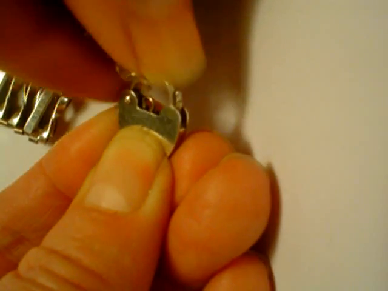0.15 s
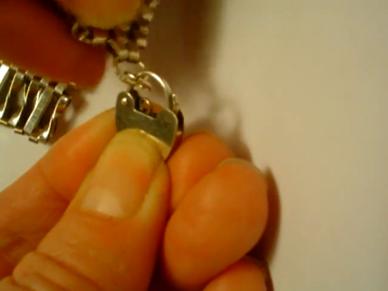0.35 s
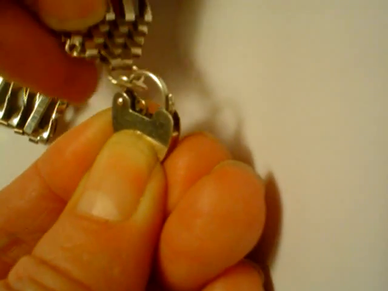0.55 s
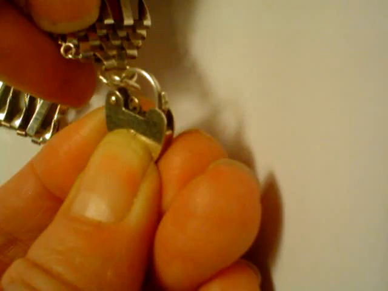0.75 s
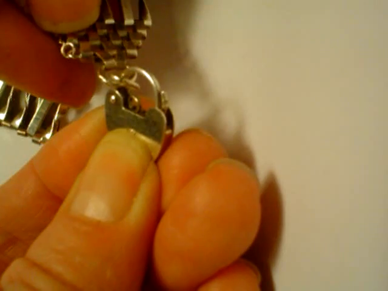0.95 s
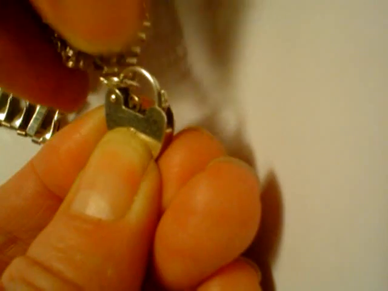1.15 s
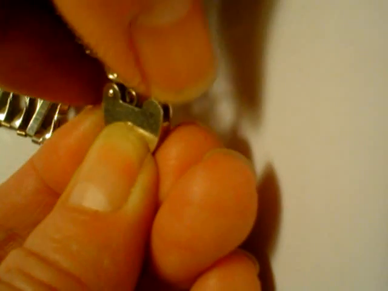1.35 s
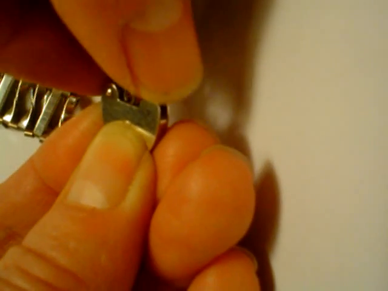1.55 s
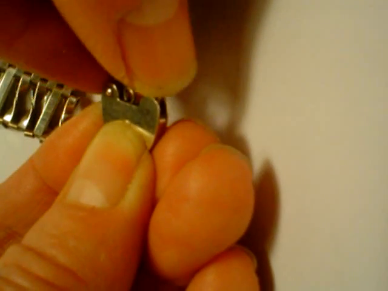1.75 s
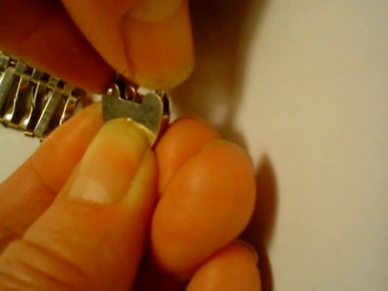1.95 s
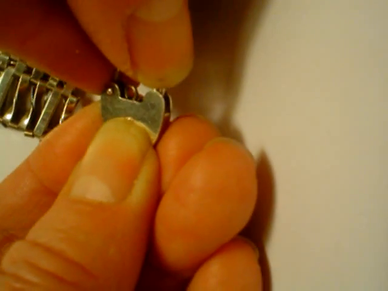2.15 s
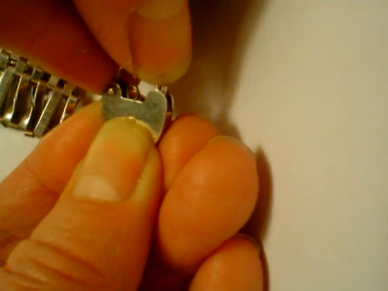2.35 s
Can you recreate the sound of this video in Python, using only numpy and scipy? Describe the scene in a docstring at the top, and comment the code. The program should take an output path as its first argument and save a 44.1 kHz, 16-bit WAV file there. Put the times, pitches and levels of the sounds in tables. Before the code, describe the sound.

Small metal clasp snapped sharply by fingers, a second rattling snap, then faint ticks over hiss

```python
"""Fingers snap a small metal padlock clasp open and shut close by, and bracelet links tick: short rattles of
impacts ring the damped metal. The strongest snaps also thump through hands and table.
Skin slides on the metal as a dense crackle of tiny slips. Around them a small motor hums in wavering
partials, over a steady, patchy hiss and a thin electronic whine made of two high sines."""
import sys
import numpy as np
from scipy import signal
from scipy.fft import rfft, irfft
from scipy.io import wavfile
from scipy.ndimage import uniform_filter1d

SR = 44100
rng = np.random.default_rng(int(sys.argv[2]) if len(sys.argv) > 2 else 0)


def inscribe(sig):
    """Save sig as 16-bit PCM at rate SR to the path in sys.argv[1].

    A 1-D sig is mono; a 2-D sig holds one channel per row.
    Samples are clipped to [-1, 1] before scaling.
    """
    pcm = np.round(np.clip(np.atleast_2d(sig).T, -1, 1) * 32767)
    wavfile.write(sys.argv[1], SR, pcm.astype(np.int16))


N = 105840  # length in samples: 2.4 s
MOTOR_HZ = 48.44  # motor speed, shared by the hum and the throb of the hiss


def amp(db):
    """Turns dB into a plain multiplier."""
    return 10 ** (np.asarray(db) / 20)


def evened(x):
    """Scales x to rms 1."""
    return x / np.sqrt(np.mean(x ** 2) + 1e-20)


def read(points, hz):
    """Reads a table of pitches between its points, on a log pitch scale."""
    f, value = np.transpose(points)
    return np.interp(np.log(hz + 1), np.log(f + 1), value)


def over_time(points):
    """Reads a table of times at every sample, in straight lines between its points."""
    return np.interp(np.arange(N) / SR, *np.transpose(points))


def add(mix, s, sound):
    """Mixes a sound in at s seconds, cut off at the end of the mix."""
    part = mix[round(s * SR):][:len(sound)]
    part += sound[:len(part)]


def coloured(x, spectrum):
    """Filters x by the spectrum, then sets it to rms 1."""
    gain = amp(read(spectrum, np.fft.rfftfreq(len(x), 1 / SR)))
    return evened(irfft(rfft(x) * gain, len(x)))


def drift(hz):
    """Slow random wander below hz, at rms 1; the first second is dropped so the filter has settled."""
    wander = signal.lfilter(*signal.butter(2, hz, fs=SR), rng.standard_normal(N + SR))
    return evened(wander[SR:])


# How the room noise spreads over pitch: (f/Hz, level/dB per Hz)
ROOM_SPECTRUM = [(20, -33), (60, -22), (105, -22.5), (135, -12), (200, -8), (280, -3), (360, -10),
                 (480, -13.5), (700, -15.5), (1150, -21), (1500, -30), (2700, -33), (5000, -39),
                 (10100, -43.5)]
ROOM_DB = -43  # rms
PATCHY_DB, THROB = 3, 0.091  # unevenness in time and pitch; depth of the throb as a share


def room_noise():
    """Hiss and rumble, patchy in time and pitch, throbbing once per turn of the motor."""
    frames, t = N // 256 + 5, np.arange(N) / SR
    real, imaginary, patches = rng.standard_normal((frames, 513, 3)).T
    # blur the patches over pitch, then over time
    patches = uniform_filter1d(patches, 8, 0)
    patches = evened(uniform_filter1d(patches, 8, 1))
    spectrum = (real + 1j * imaginary) * amp(PATCHY_DB * patches)
    noise = signal.istft(spectrum, nperseg=1024, noverlap=768)[1][:N]
    throb = 1 + THROB * np.cos(2 * np.pi * MOTOR_HZ * t)
    return coloured(noise * throb, ROOM_SPECTRUM) * amp(ROOM_DB)


def tone(hz, db):
    """A pure tone from a random starting point; db is its rms level."""
    turns = hz * np.arange(N) / SR + rng.random()
    return np.sqrt(2) * amp(db) * np.sin(2 * np.pi * turns)


# Parts of the motor's hum: (multiple of the motor speed, rms level before wavering/dB)
HUM_PARTIALS = [(3, -51), (4, -59), (5, -50.5), (6, -46), (7, -66.5), (8, -58), (10, -57)]
WAVER_HZ, WAVER = 3.06, 0.37  # how fast the loudness wanders, and its rms depth as a share


def motor_hum():
    """The motor sounds at multiples of its speed, each wandering in loudness on its own."""
    out = np.zeros(N)
    for multiple, db in HUM_PARTIALS:
        out += tone(multiple * MOTOR_HZ, db) * (1 + WAVER * drift(WAVER_HZ))
    return out


# The two tones of the electronic whine: (f/Hz, level added to the whine's course/dB)
WHINE_TONES = [(8075, -7.5), (8100, 5.5)]
# Course of the whine's loudness: (t/s, rms level before each tone's own is added/dB)
WHINE_COURSE = [(0, -82), (.6, -79), (1.2, -77), (1.55, -74), (2.4, -72.5)]


def whine():
    """Two steady, high, close pitches that slowly grow louder."""
    course_db = over_time(WHINE_COURSE)
    return sum(tone(hz, db + course_db) for hz, db in WHINE_TONES)


# How loudly the skin slides: (t/s, level/dB)
SLIDE_LEVEL = [(0.0, -66.5), (.13, -55), (.17, -46.5), (0.241, -37.5), (.3, -40.5), (0.392, -42.5),
               (.44, -54.5), (.52, -52), (.62, -53), (.7, -58.5), (1.14, -64.5), (1.22, -53), (1.33, -50),
               (1.45, -52.5), (1.52, -46), (1.6, -54), (1.68, -59), (1.9, -58.5), (2.05, -60),
               (2.14, -54.5), (2.27, -63.5), (2.4, -53.5)]
# Tone colour of skin on metal: (f/Hz, level/dB per Hz)
SKIN_COLOUR = [(300, -35.5), (600, -14), (900, -6.5), (1200, -7.5), (1700, -10), (3500, -17.5), (6000, -24),
               (10000, -31.5)]
# Edges of the pitch regions that clump separately: (f/Hz)
SKIN_REGIONS = [300, 900, 1600, 2600, 4200, 6500, 10000]
GRIT_PER_S, GRIT_DB = 7000, 1.6  # slips per second in each region; mean random lift of a slip
CLUMP_HZ, CLUMP_DB = 55, 2.6  # how fast the slips grow louder and softer, and by how much (rms)


def slide():
    """Dense tiny slips of skin over the clasp, clumping separately in each pitch region."""
    slips = np.zeros(N)
    for low, high in zip(SKIN_REGIONS, SKIN_REGIONS[1:]):
        lift_db = GRIT_DB * rng.exponential(1, N) + CLUMP_DB * drift(CLUMP_HZ)
        slipping = rng.random(N) < GRIT_PER_S / SR
        grit = rng.standard_normal(N) * amp(lift_db) * slipping
        slips += signal.lfilter(*signal.butter(2, [low, high], "band", fs=SR), grit)
    return coloured(slips, SKIN_COLOUR) * amp(over_time(SLIDE_LEVEL))


CONTACT_MS = 0.06  # softness of an impact's edge


def ring(modes, extra_db, size=1800):
    """Dying modes after one soft-edged impact, neighbours in opposite phase."""
    hz, db, t60 = np.transpose(modes)[:, :, None]
    t = np.arange(size) / SR
    side = (-1.) ** np.arange(len(modes))[:, None]
    loudness = amp(db + extra_db[:, None] - 60 * t / t60)
    ringing = (side * loudness * np.sin(2 * np.pi * hz * t)).sum(0)
    return ringing * (1 - np.exp(-t * 1000 / CONTACT_MS))


# Clasp and link contacts: (t/s, level/dB, rattle length/ms where 0 or less is one clean impact,
# middle modes/dB, top modes/dB, and, where one mode rings out most, its f/Hz)
CONTACTS = [(0.0704, -36, 2.5, -14, -7), (.155, -40, 7, 7, 10), (0.182, -36, -0.5, -12, -6),
            (0.198, -40, 2, -3, 1), (.2134, -40, 11, -3, -10), (0.229, -32.5, 3.5, -4, -10),
            (0.2598, -12.5, 0, 4, 3), (0.2622, -20, -0.5, 0, -5, 2433), (0.2962, -28, 1, 9, 12, 3330),
            (0.301, -31, 1, 10, 5, 3330), (0.451, -37.5, 3.5, 3, 13.5), (.4853, -57, 4, 12, 5),
            (.5033, -33, 4, 0.5, 9, 1760), (.525, -39.5, 7.3, 3, 18), (0.55, -38.5, 4, -3, 16),
            (0.619, -43, 2, 1, 21), (.755, -46.5, 2.5, -9, 1), (0.9443, -31.5, 6, 2, 8, 960),
            (1.155, -35, 1.9, -10, -11), (1.1785, -18, -0.5, -6, 1), (1.1797, -27, 0, 2, 6),
            (1.204, -15, 1, -4, -5), (1.2061, -18, -1, 0, 4, 3330), (1.2082, -15.5, 0.5, 2, 3, 1760),
            (1.21, -20, 0, -4, -4, 1292), (1.2165, -22.5, 0, -4, -2), (1.2894, -41, 1.5, -9, 10),
            (1.334, -41, 3, -8, 8), (1.3764, -27, 0, 4, 9, 2830), (1.4329, -26, 0, 5, 13),
            (1.4343, -23, .8, 8, 14), (1.4356, -26, 3, -1, 12), (1.4388, -26.5, 4, 2, 4, 5250),
            (1.4497, -36, 1.4, 8, 3, 3330), (1.4696, -37.5, 2.9, -5, 6), (1.4957, -30, 0.8, 2, 6, 3330),
            (1.508, -26.5, 5, -3, 5, 960), (1.522, -33.5, 8, -4, 3), (1.542, -25, 3.5, 4, 8, 960),
            (1.5547, -29.5, 4.5, 0, -6, 960), (1.57, -34.5, 1, 4, 8.5), (1.5946, -40, 2.5, -6, -4),
            (1.625, -38.5, 1.4, 12, 3, 3330), (1.7173, -40, 1.4, 5, 14, 5250), (1.7305, -42, 7.5, -4, 25),
            (1.869, -45, 2, 0, 6), (1.891, -39, 3.5, -11, -5), (1.9464, -40.5, 3.5, -12, 0),
            (2.14, -34.5, 8, -0.5, 11, 5250), (2.2022, -38, 0, -1, -1), (2.2217, -34.5, 1.4, -1.5, 8),
            (2.2696, -45, 5.6, 11, 13)]
# Ringing modes of the hand-damped clasp: (f/Hz, level/dB, time to die by 60 dB/s)
CLASP_MODES = [(785, -6.5, 0.024), (970, -1.5, 0.0092), (1289, -1, 0.016), (1820, -5.5, 0.01),
               (2190, -5.5, 0.012), (2320, -4, 0.0077), (2680, -8, 0.0094), (3300, -5, 0.012),
               (3980, -7.5, 0.008), (4720, -11.5, 0.0061), (5280, -8.5, 0.0047), (6160, -7, 0.0024),
               (6980, -7.5, 0.0021), (9020, -15, 0.0026)]
MIDDLE_HZ, TOP_HZ = 2000, 4400  # where the middle and top modes begin
MODE_SCATTER_DB = 1.2  # random unevenness of the modes (rms)
FAVOUR_DB, FAVOUR_WIDTH = 9, .08  # lift of the favoured mode, and its reach as a share of pitch
IMPACTS, IMPACTS_PER_MS = 8, 1.4  # most impacts in a rattle; extra impacts per ms of rattle
RATTLE_FADE_DB, RATTLE_RISE = -11.5, 0.34  # fade over the rattle; share of it spent swelling
LEVEL_SAMPLES = 32  # a contact's level is its energy as an rms over this span


def clasp():
    """Each contact is a short rattle of impacts ringing the clasp, struck at a different spot each time."""
    out, hz = np.zeros(N), np.array(CLASP_MODES)[:, 0]
    luck = rng.random((len(CONTACTS), 2, IMPACTS))
    unevenness = rng.standard_normal((len(CONTACTS), len(CLASP_MODES)))
    for contact, (slot, size), uneven in zip(CONTACTS, luck, unevenness):
        s, db, ms, middle_db, top_db, *favoured_hz = contact
        count = int(np.clip(1 + ms * IMPACTS_PER_MS, 1, IMPACTS))
        order = np.arange(count)
        # place in the rattle, 0 to 1; the first impact opens it
        where = (order + slot[:count] * (order > 0)) / count
        swell = np.clip(.5 + .5 * where / RATTLE_RISE, 0, 1)
        strength = amp(RATTLE_FADE_DB * where) * (.5 + .5 * size[:count]) * swell
        hits = np.zeros(2000)
        np.add.at(hits, (where * np.clip(ms, 0, 30) * SR / 1000).astype(int), strength)

        spot_db = np.where(hz > TOP_HZ, top_db, np.where(hz > MIDDLE_HZ, middle_db, 0.))
        for f in favoured_hz:
            spot_db = spot_db + FAVOUR_DB * np.exp(-(np.log(hz / f) / FAVOUR_WIDTH) ** 2)
        sound = np.convolve(hits, ring(CLASP_MODES, spot_db + MODE_SCATTER_DB * uneven))
        level = np.sqrt(np.sum(sound ** 2) / LEVEL_SAMPLES)
        add(out, s, -amp(db) * sound / level)
    return out


ECHO_DB, ECHO_T60 = -15.5, 0.049  # echo level; seconds for it to die by 60 dB


def scatter(x):
    """Table and hands scatter the sound into a short diffuse tail, starting 2 ms later."""
    t = np.arange(4000) / SR
    tail = rng.standard_normal(len(t)) * amp(-60 * t / ECHO_T60) * (t > .002)
    tail /= np.linalg.norm(tail)
    return x + amp(ECHO_DB) * signal.oaconvolve(x, tail)[:N]


# The latch's jolt thumping through hands and table: (t/s, peak level before the bass cut/dB, rise/ms)
JOLTS = [(0.2596, -2.5, 0.25), (1.1791, -20, 0.43), (1.2038, -15, 0.35), (1.2165, -11.5, 0.72)]
# Modes of the thump: (f/Hz, level/dB, time to die by 60 dB/s)
THUMP_MODES = [(283.6, 5.5, 0.017), (213, -23, 0.018), (437, -9, 0.029), (726, -4, 0.025),
               (1210, -18.5, 0.036)]


def thuds():
    """A rounded push rings the low, damped modes of hands and table."""
    hz, db, t60 = np.transpose(THUMP_MODES)[:, :, None]
    t = np.arange(3000) / SR
    body = (amp(db - 60 * t / t60) * np.cos(2 * np.pi * hz * t)).sum(0)
    out = np.zeros(N)
    for s, peak_db, rise_ms in JOLTS:
        push = np.hanning(int(rise_ms * SR / 500) + 3)  # rises, then falls as long
        sound = np.convolve(body, push)
        add(out, s, amp(peak_db) * sound / abs(sound).max())
    return out


def scene():
    """Mixes all layers; contacts and thumps lose their deep bass below 90 Hz, as at a small microphone."""
    background = room_noise() + motor_hum() + whine()
    skin = slide()
    contacts = scatter(clasp()) + thuds()
    contacts = signal.lfilter(*signal.butter(2, 90, "high", fs=SR), contacts)
    return (background + skin + contacts)[None]


EDGE_HZ = 10150  # top of the sound


def record(dry):
    """Removes the treble above a steep edge."""
    low_pass = signal.firwin(511, EDGE_HZ, window=("kaiser", 9), fs=SR)
    return signal.oaconvolve(dry, low_pass[None], "same")


dry = scene()
out = record(dry)
inscribe(out)
```